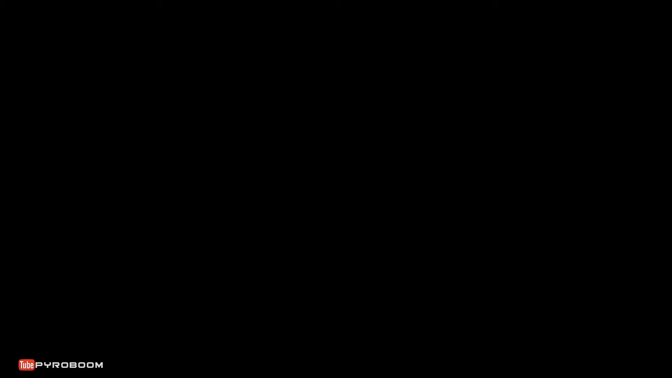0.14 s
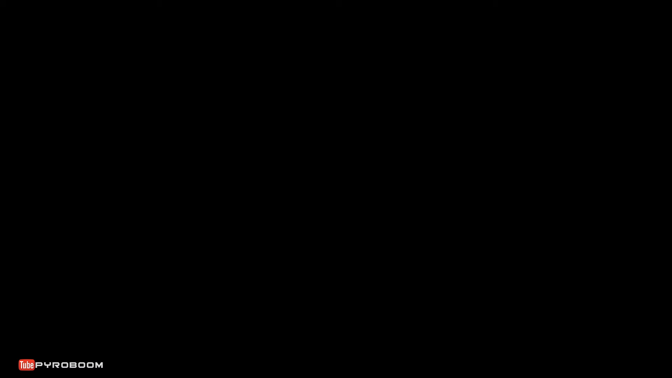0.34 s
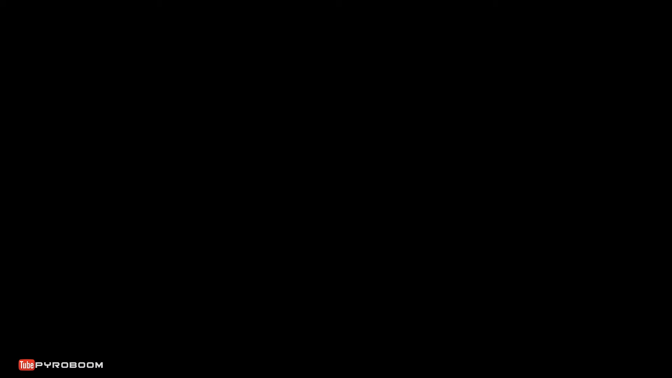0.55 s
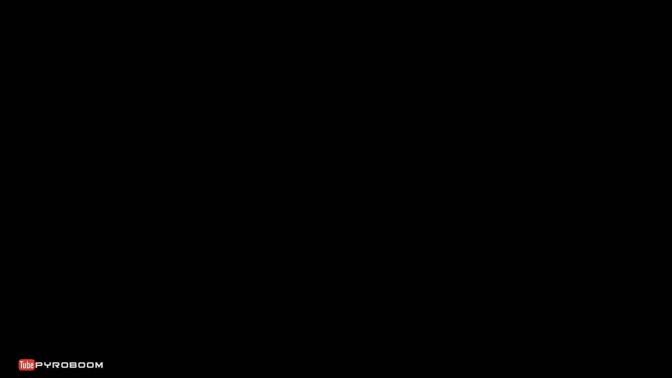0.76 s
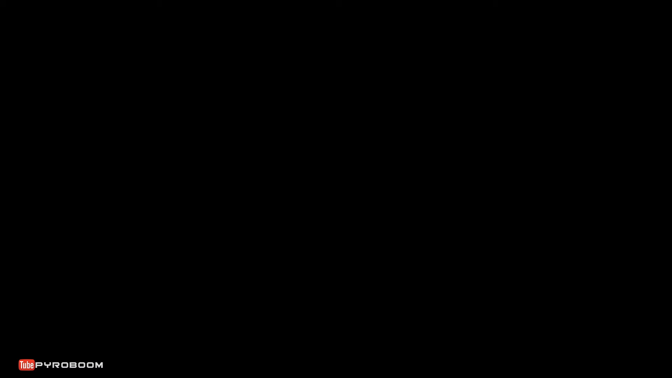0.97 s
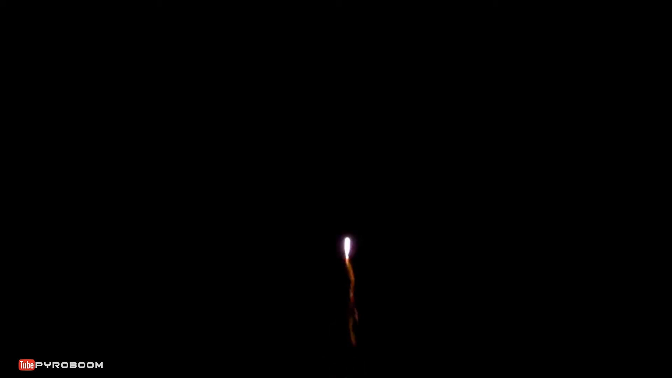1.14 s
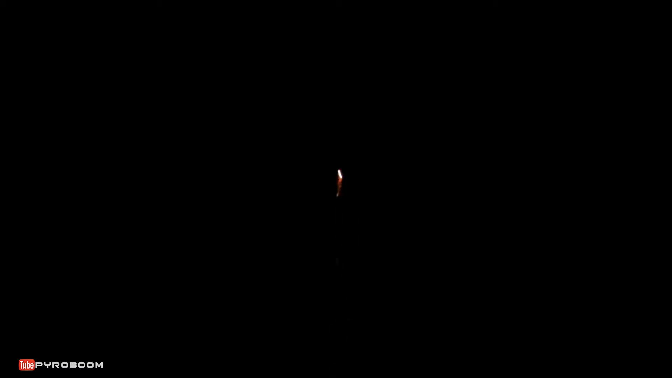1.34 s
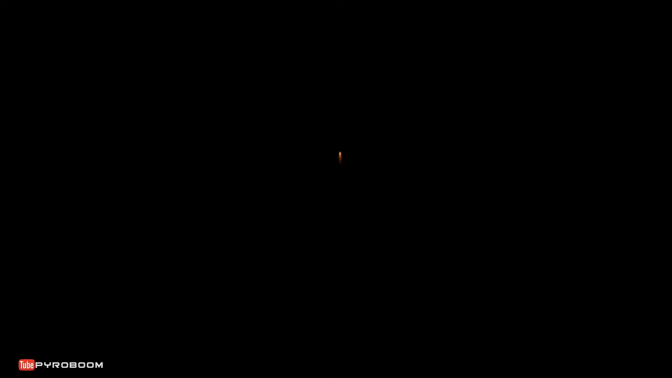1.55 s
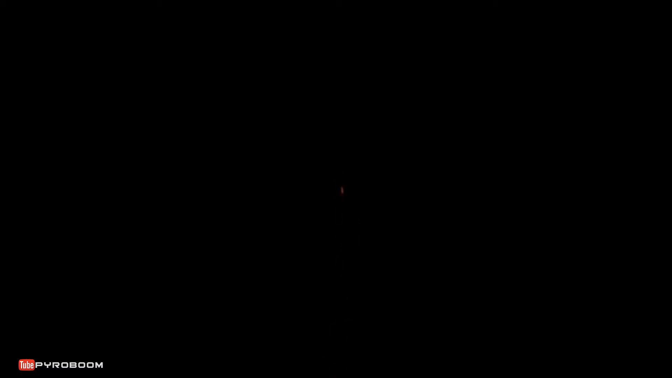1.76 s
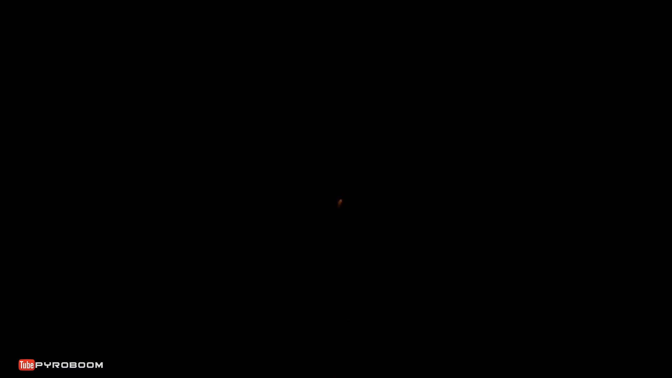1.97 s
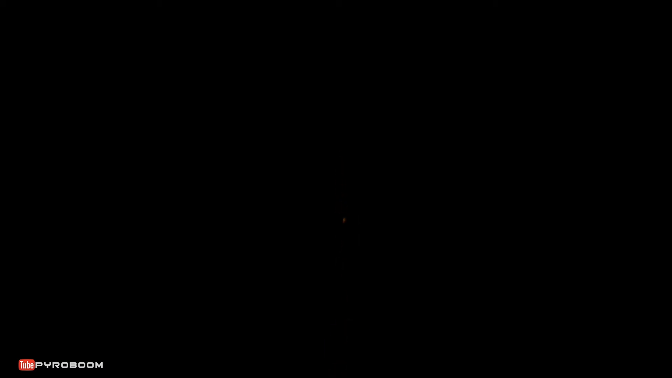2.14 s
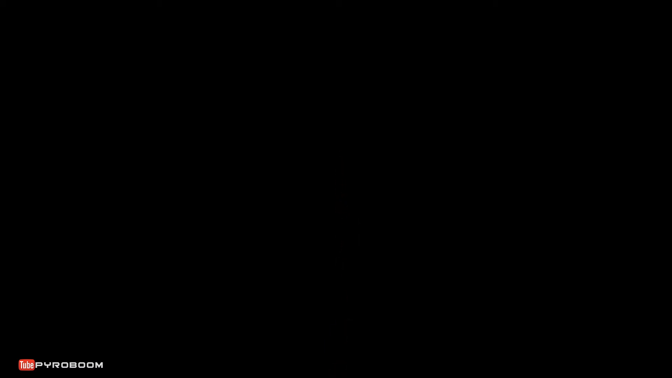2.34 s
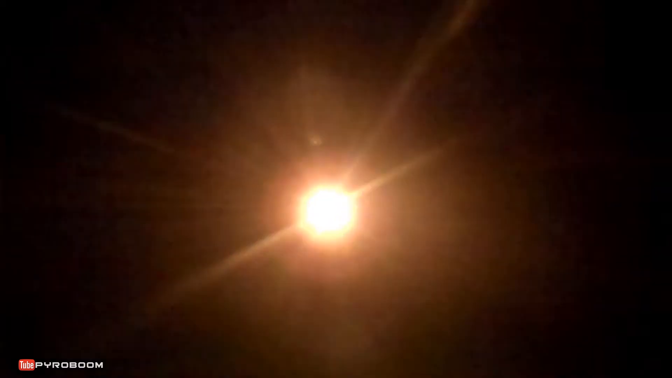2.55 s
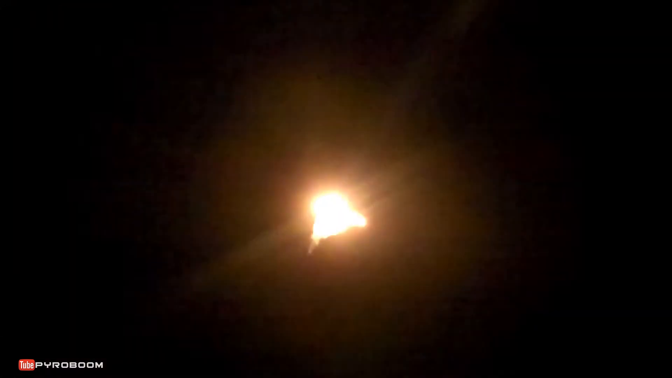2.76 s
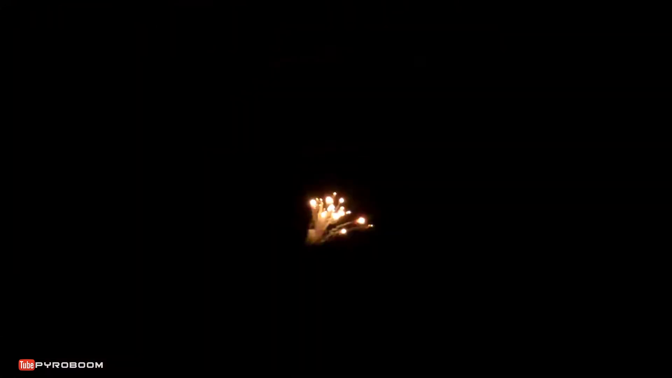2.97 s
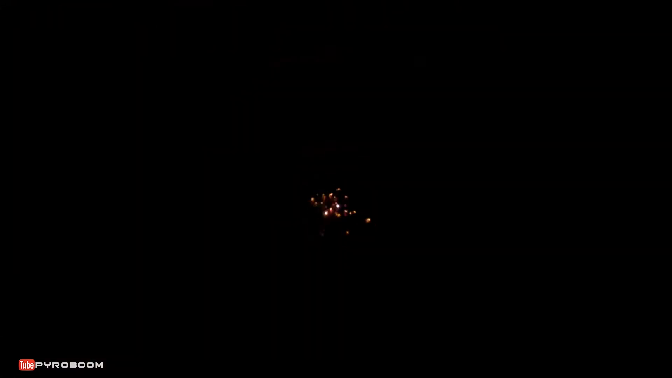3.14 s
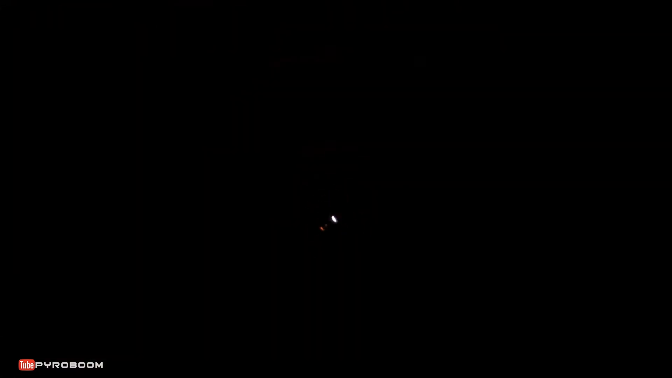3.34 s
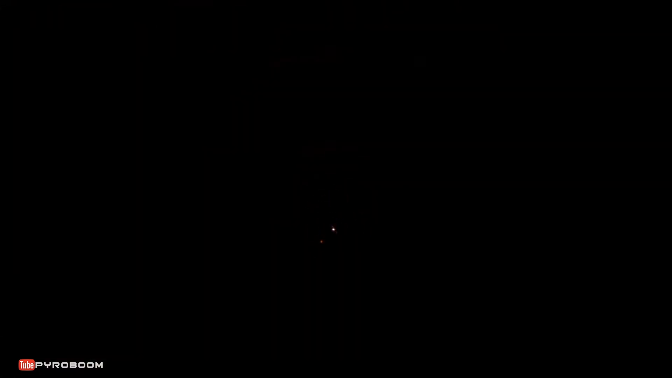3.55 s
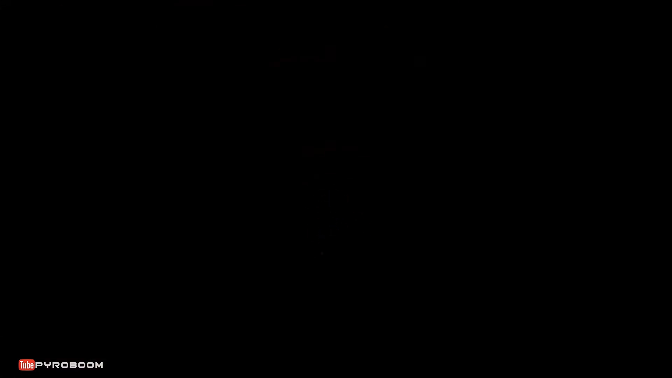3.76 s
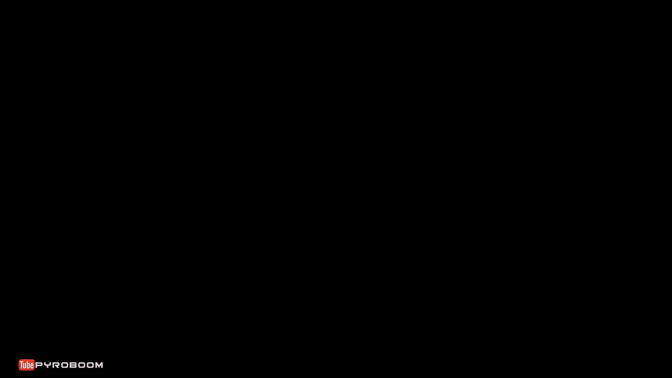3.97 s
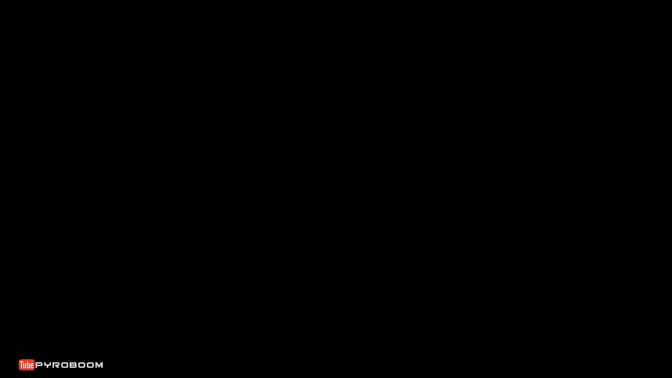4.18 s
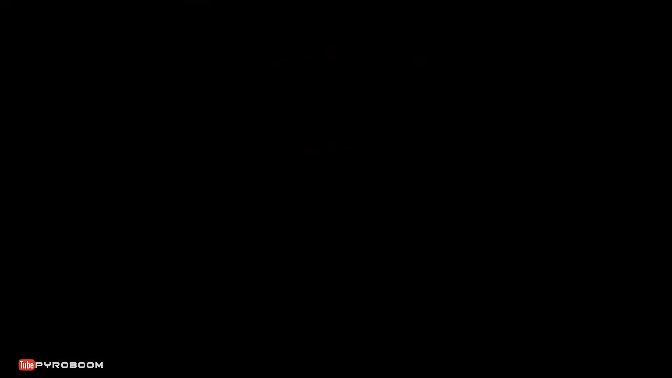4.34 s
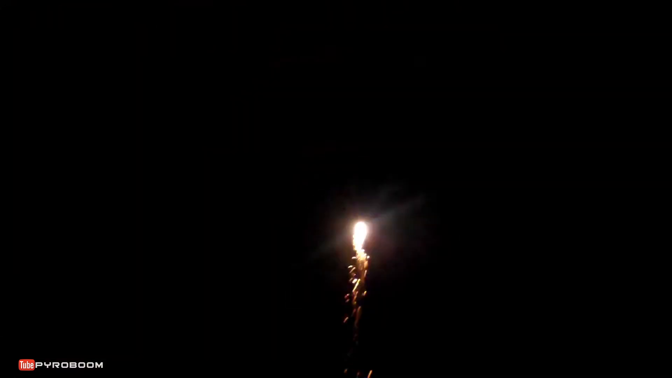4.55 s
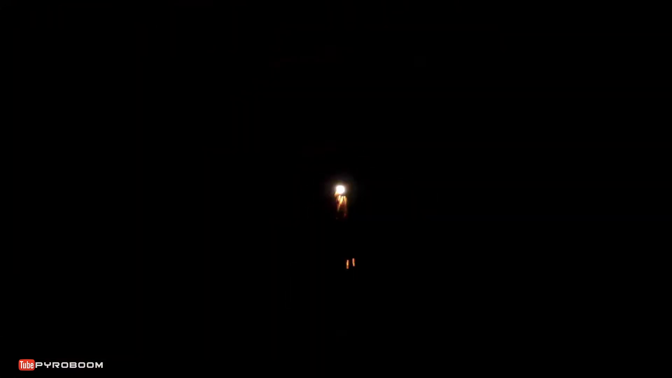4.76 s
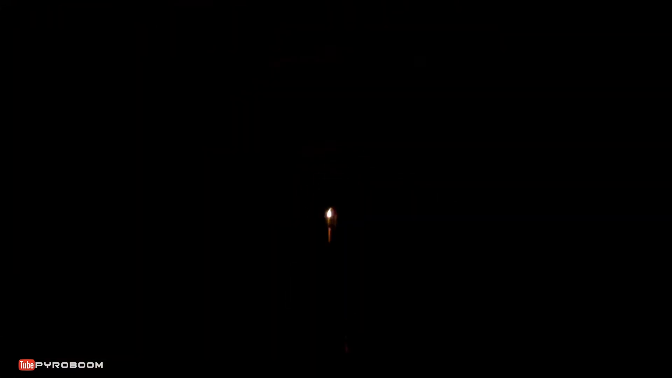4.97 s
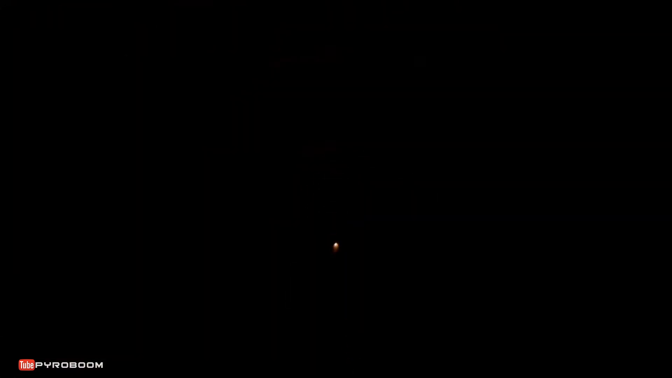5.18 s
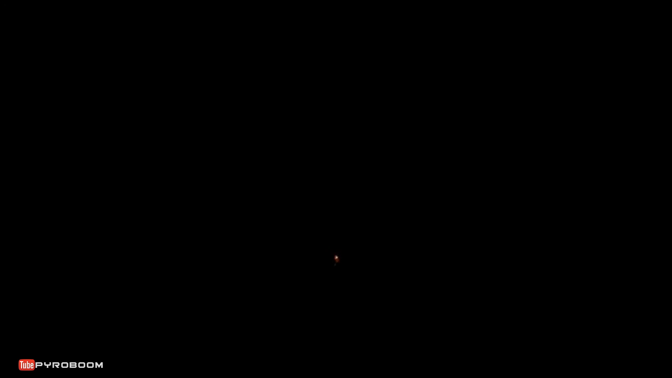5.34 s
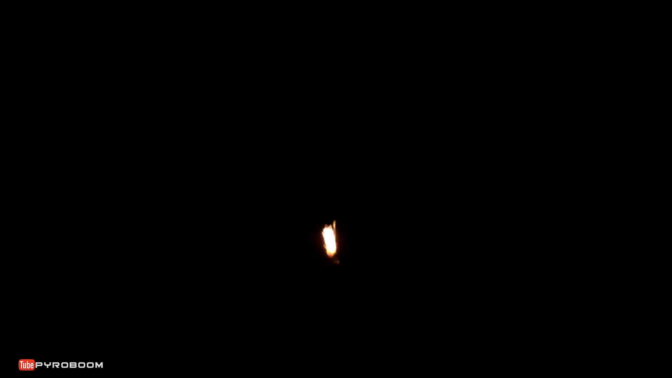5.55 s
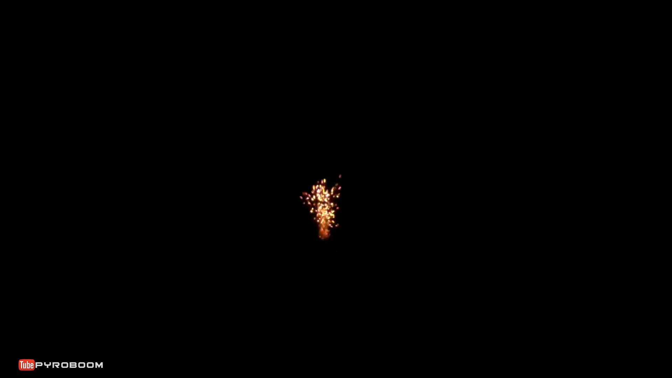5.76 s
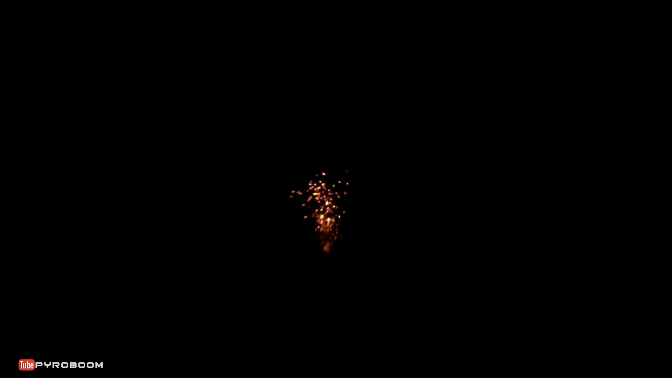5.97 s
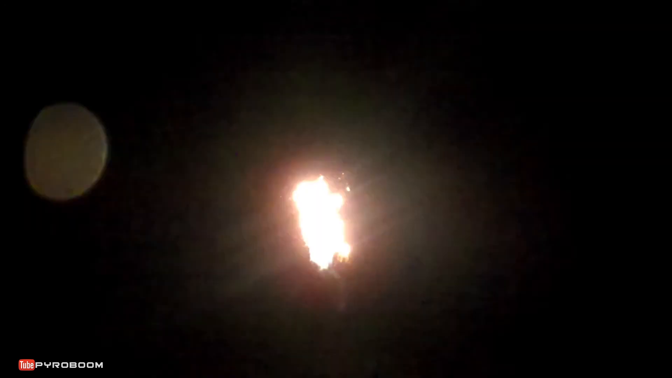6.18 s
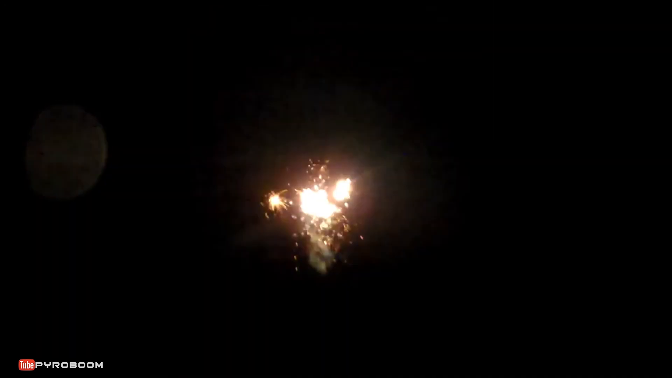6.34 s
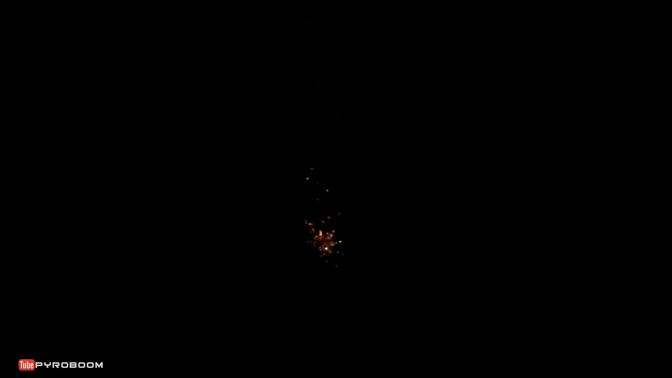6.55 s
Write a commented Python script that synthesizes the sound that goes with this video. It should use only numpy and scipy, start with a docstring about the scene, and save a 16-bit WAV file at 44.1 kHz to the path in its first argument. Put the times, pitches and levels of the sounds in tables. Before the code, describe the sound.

Soft, low night air and faint microphone hiss, with one tiny tick at 0.1 s. At 0.9 s a roman candle's lift charge explodes: a hard, clipped bang with bass push, short tubular ring and close slap, then far echoes rolling off and darkening over about a second. From 1.8 s a barely audible comet hiss rises. At 2.57 s the shot opens with a soft puffing pop and smooth bright hiss; a dull distant thud lands at 2.64 s, and the hiss dies by about 3.2 s. Quiet returns. At 4.25 s a second bang, thinner and higher-ringing, echoes away. Faint hiss from 4.85 s, small pops at 5.56 s and a stronger hiss fading, with tiny ticks. From 6.19 s single loud cracks burst into a dense volley at 6.24 s, sharp and overloaded with echoes, thinning into scattered weaker snaps by 6.6 s. Left is bright and piercing, right muffled.

```python
"""A roman candle fires outdoors at night: two lift charges bang and roll away in far echoes.
Shots open with pops (short swelling noise) and hisses (bright noise): a faint one as of a rising comet, then a
stronger one of burning stars. The stars of the second shot end in a dense volley of cracks, each a tiny blast wave.
A dull report is farther off, behind it the soft noise of the night. Two unlike microphone ports overload."""
import sys
import numpy as np
from scipy import signal
from scipy.fft import rfft, irfft
from scipy.io import wavfile

SR = 44100
rng = np.random.default_rng(int(sys.argv[2]) if len(sys.argv) > 2 else 0)


def waveform_to_disk(signal):
    """Save audio, clipped to [-1, 1], as 16-bit WAV at the path in sys.argv[1]."""
    frames = np.transpose(np.atleast_2d(signal))
    scaled = np.clip(frames, -1, 1) * 32767
    samples = np.round(scaled).astype(np.int16)
    wavfile.write(sys.argv[1], SR, samples)


N = 291501
TIME = np.arange(N) / SR   # s


# The two lift charges: (time [s], blast level [dB], boom peak [dB], boom overpressure [ms],
# ring of the tube [Hz], near echo level [dB], far echo level [dB], far echoes hold until [s after the bang])
LIFT_CHARGES = [(.9017, 9.5, -8, 3.6, 1297, -6, -31, 0.49),
                (4.2465, 7, -28.5, 1.5, 2090, -6.5, -31.5, 0.38)]
# Spectrum of the blast at the tube: (frequency [Hz], relative level [dB per Hz])
BLAST_SPECTRUM = [(25, -19), (100, -10.5), (250, -0.5), (550, 1.5), (900, -4), (1300, -5.5), (2500, -6.5),
                  (6000, -13.5), (15000, -17)]
# Spectrum of the near echoes: (frequency [Hz], relative level [dB per Hz])
NEAR_ECHO_SPECTRUM = [(25, -11.5), (100, -3.5), (250, -1), (500, 3.5), (850, -2.5), (1400, -1), (2500, -3),
                      (4200, -1.5), (6500, -8), (10000, -4.5), (15000, -22)]
NEAR_ECHO_T60_S = 0.14


def lifts(blast_t60=0.028, ring_db=2, ring_q=4, pre_swell_db=-23, pre_swell_s=.016, count=SR // 2):
    """A brief swell of noise comes just before each bang; then the ringing blast, near echoes and the far roll."""
    out, t = np.zeros((2, N)), TIME[:count]
    pre_swell_count = int(pre_swell_s * SR)
    for s, blast_db, boom_db, boom_ms, ring_hz, near_db, far_db, hold_s in LIFT_CHARGES:
        pre_swell = air_noise(POP_SPECTRUM, pre_swell_count) * np.sqrt(np.linspace(0, 1, pre_swell_count))
        add(out, s - pre_swell_s, from_db(pre_swell_db) * pre_swell)
        add(out, s, from_db(boom_db) * shock(boom_ms))   # the tube's push of gas carries the bass
        blast = from_db(blast_db) * air_noise(BLAST_SPECTRUM, count) * dying(t, blast_t60)
        tube_ring = signal.lfilter(*signal.iirpeak(ring_hz, ring_q, fs=SR), blast)
        add(out, s, blast + from_db(ring_db) * tube_ring)
        near_echoes = air_noise(NEAR_ECHO_SPECTRUM, count) * dying(t, NEAR_ECHO_T60_S)
        add(out, s, from_db(near_db) * near_echoes)
        add(out, s, from_db(far_db) * far_echoes(hold_s))
    return out


# Single far walls: (time after a report [s], level against the scatter, before the losses on the way [dB])
FAR_WALLS = [(.129, 9), (.197, 10), (.279, 12)]
# Spectrum of a wall's echo: (frequency [Hz], relative level [dB per Hz])
WALL_SPECTRUM = [(25, -14), (90, 13), (180, 31), (400, -16), (1300, 17), (4500, -10), (10000, 0),
                 (15000, -24)]
# Spectrum of the far scatter as it sets out: (frequency [Hz], relative level [dB per Hz])
FAR_SPECTRUM = [(25, -21.5), (80, -6.5), (160, 1), (320, -3.5), (600, 1.5), (1300, 0), (2200, 0.5),
                (4500, -1), (6500, -6.5), (10000, -10), (15000, -22.5)]
ROLL_RISE_S, ROLL_FADE_DB_PER_S = .07, 32
AIR_DB_PER_S, GROUND_DB_PER_S = 32.5, 32   # further loss of treble and of bass


def far_echoes(hold_s, count=2 * SR, lumpy_db=1.0, wall_t60=0.022, bass_hz=300, treble_hz=2500):
    """Scatter from trees and houses; air takes its treble and the ground its bass as the path grows."""
    t = TIME[:count]
    lumps = rms_one(low_pass(rng.standard_normal(count), 77, order=2))
    roll = envelope(t, ROLL_RISE_S, hold_s, ROLL_FADE_DB_PER_S)
    scatter = air_noise(FAR_SPECTRUM, count) * roll * from_db(lumpy_db * lumps)
    for s, db in FAR_WALLS:
        wall_echo = air_noise(WALL_SPECTRUM, count=2048) * dying(TIME[:2048], wall_t60)
        add(scatter, s, from_db(db) * wall_echo)
    bass = signal.sosfiltfilt(signal.butter(2, bass_hz, fs=SR, output="sos"), scatter)
    treble = signal.sosfiltfilt(signal.butter(1, treble_hz, "high", fs=SR, output="sos"), scatter)
    middle = scatter - bass - treble
    return middle + bass * from_db(-GROUND_DB_PER_S * t) + treble * from_db(-AIR_DB_PER_S * t)


# Stars that crack alone, before and after the thick of the volley: (time [s], peak of the direct sound [dB])
LONE_CRACKS = [(6.1897, 16), (6.2019, 9.5), (6.219, 13), (6.2245, 10.5), (6.2313, 7), (6.2372, 10.5),
               (6.242, 11), (6.5204, -9), (6.5409, -6.5), (6.5479, -10), (6.5523, -10.5), (6.5651, -8),
               (6.5833, -7), (6.5862, -7), (6.5948, -13)]
CRACK_MS = .16   # length of a lone crack's overpressure
# Spectrum of the cracks' near echoes: (frequency [Hz], relative level [dB per Hz])
SKY_SPECTRUM = [(30, -11), (200, 9.5), (700, 3), (1400, -3), (2100, 0), (3500, 2), (6200, 4.5), (8000, 10),
                (14000, -11)]
CRACK_ECHO_DB = -38   # near echoes, as a filter gain


def crackle(near_t60=0.13, far_db=-64, far_hold_s=.3, count=SR // 4):
    """Every star ends in a tiny shock; the ground and the surroundings smear them together."""
    direct = volley()
    for s, db in LONE_CRACKS:
        add(direct, s, from_db(db) * shock(CRACK_MS))
    echoes = from_db(far_db) * far_echoes(far_hold_s)
    near_echoes = air_noise(SKY_SPECTRUM, count) * dying(TIME[:count], near_t60)
    add(echoes, .0045, from_db(CRACK_ECHO_DB) * near_echoes)
    return direct + signal.fftconvolve(direct[None], echoes, axes=-1)[:, :N]


# The volley, by size of star: (first rate [cracks per s], all spent after [s], typical peak before the surge [dB],
# fade [dB per s], typical overpressure [ms])
STAR_SIZES = [(290, .29, -2.5, 15, .14), (600, .32, -7.5, 15, .09)]
VOLLEY_START_S = 6.243
SURGE_DB, SURGE_S = 12.5, .014   # the volley opens with a short, louder surge
STAR_SPREAD_DB, LENGTH_SPREAD = 2, 0.16   # from star to star; the length's in natural log


def volley(count=300):
    """Stars go off at uneven moments, ever sparser and weaker until all are spent."""
    out, t = np.zeros(N), TIME[:SR]
    for per_s, spent_s, db, fade_db_per_s, length_ms in STAR_SIZES:
        gone_off = np.cumsum(per_s * np.maximum(1 - (t / spent_s) ** 2, 0)) / SR   # expected count so far
        turns = np.arange(count) + 2 * rng.random(count)
        chance = rng.standard_normal((count, 2))
        for turn, (size, length) in zip(turns[turns < gone_off[-1]], chance):
            age = t[np.searchsorted(gone_off, turn)]
            surge_db = SURGE_DB * np.exp(-(age / SURGE_S) ** 2)
            peak_db = db - fade_db_per_s * age + surge_db + STAR_SPREAD_DB * size
            crack = shock(length_ms * np.exp(LENGTH_SPREAD * length))
            add(out, VOLLEY_START_S + age, from_db(peak_db) * crack)
    return out


# Small ticks and pops: one bright tick near the start, others around the openings of the shots:
# (time of the peak [s], level [dB], half the length of the swell [s], t60 [s], tilt above 1 kHz [dB per octave])
SMALL_POPS = [(.0955, -43, .002, .02, 5), (2.571, -20, .011, .018, 0), (2.584, -33, .002, .04, -5),
              (5.5595, -33, .001, .014, -7), (5.5725, -32.5, .004, .025, -3), (5.584, -38, .002, .05, -6),
              (5.845, -49, .001, .02, 2), (5.867, -48, .001, .02, 2), (6.133, -48, .001, .02, -2)]
# Spectrum of a pop before its tilt: (frequency [Hz], relative level [dB per Hz])
POP_SPECTRUM = [(30, -32), (90, -18), (160, -2.5), (300, -3), (800, -5), (1500, 0), (3000, -5), (4600, -1),
                (7000, -0.5), (15000, -9)]


def pops(count=SR // 4):
    """Short bursts of noise that swell and then die away quickly."""
    out, t = np.zeros((2, N)), TIME[:count]
    for s, db, half_swell, t60, tilt_db in SMALL_POPS:
        spectrum = [(hz, level + tilt_db * np.log2(max(hz, 1000))) for hz, level in POP_SPECTRUM]
        swell = 2 * half_swell
        rise = dying(np.maximum(swell - t, 0), swell)
        fall = dying(np.maximum(t - swell, 0), t60)
        add(out, s - swell, from_db(db) * air_noise(spectrum, count) * rise * fall)
    return out


# Hisses: a faint one before each opening, as of a rising comet, then the stronger burning stars:
# (time [s], level before the gain and the sag [dB], rise [s], hold until [s after the start],
# fade beyond the sag [dB per s])
HISSES = [(1.8, -67.5, 0.072, 0.46, 60), (2.575, -52.5, 0.017, 0.51, 100), (4.85, -58.5, 0.12, 0.59, 91),
          (5.59, -50.5, .08, 0.13, 42)]
# Spectrum of the hiss: (frequency [Hz], relative level [dB per Hz])
HISS_SPECTRUM = [(100, -12), (500, -2), (1000, 1.5), (2000, -0.5), (4000, -2.5), (6500, -1.5), (9000, 0),
                 (14000, -15)]
HISS_SAG_DB_PER_S = 7   # each hiss sinks slowly


def hiss(gain_db=5.0):
    """Comets and stars hiss with a smooth, bright noise that rises, sinks slowly and goes out."""
    level = np.zeros(N)
    for s, db, rise_s, hold_s, fade_db_per_s in HISSES:
        age = TIME - s
        level += from_db(db - HISS_SAG_DB_PER_S * age) * envelope(age, rise_s, hold_s, fade_db_per_s)
    return from_db(gain_db) * level * air_noise(HISS_SPECTRUM, N)


# A dull report from farther off: (time [s], peak of its front [dB], t60 of its scatter [s])
DISTANT_THUD = (2.6405, -20.5, 0.25)
# Spectrum dulled by the distance: (frequency [Hz], relative level [dB])
DULL_SPECTRUM = [(40, -23), (270, -16), (450, -5), (750, 7), (1400, 2.5), (2500, -4.5), (4000, -16),
                 (7000, -37), (15000, -47)]
THUD_ROLL_T60_S = 1.2


def thud(front_ms=0.67, scatter_db=-13, far_db=-39, count=SR // 2):
    """A blast wave dulled by distance, with its scatter and a faint roll behind it."""
    out, t = np.zeros((2, N)), TIME[:count]
    s, db, t60 = DISTANT_THUD
    front = coloured(shock(front_ms), DULL_SPECTRUM)
    add(out, s, from_db(db) * front / np.abs(front).max())
    scatter = air_noise(DULL_SPECTRUM, count) * dying(t, t60) * (1 - dying(t, 0.0099))
    add(out, s, from_db(db + scatter_db) * scatter)
    roll = air_noise(DULL_SPECTRUM, count) * dying(t, THUD_ROLL_T60_S)
    add(out, s, from_db(db + far_db) * roll)
    return out


# Spectrum of the night air: (frequency [Hz], relative level [dB per Hz])
NIGHT_SPECTRUM = [(20, -5), (60, 1.5), (170, -3), (500, 3), (1000, 2), (1500, -4.5), (2200, -7),
                  (4000, -13.5), (6000, -21.5), (14000, -33)]


def night_air(level_db=-55):
    """The steady soft noise of the night, spread wider between the ports than the other noises."""
    return from_db(level_db) * air_noise(NIGHT_SPECTRUM, N, apart=0.45)


def shock(length_ms, suction=2.014, count=1024):
    """N-shaped blast wave: a sudden overpressure falls through zero into a suction that closes quickly."""
    age = TIME[:count] * 1000 / length_ms   # in lengths of the overpressure
    return (1 - age) * np.exp(-(age / suction) ** 8)


def air_noise(spectrum, count, apart=0.23, apart_hz=3500):
    """Noise at two close ports: mostly alike in the bass, unlike in the treble; rms 1."""
    mid, side = rng.standard_normal((2, count))
    side = side - (1 - apart) * low_pass(side, apart_hz)
    return rms_one(coloured(mid + side * [[1], [-1]], spectrum))


def envelope(age, attack_s, hold_s, release_db_per_s):
    """Rises in attack_s, stays until hold_s, then fades evenly in dB."""
    return np.clip(age / attack_s, 0, 1) * from_db(-release_db_per_s * np.maximum(age - hold_s, 0))


def dying(t, t60):
    """Falls by 60 dB in t60."""
    return np.exp(-np.log(1000) * t / t60)


def coloured(x, spectrum, size=4096):
    """Causal (minimum-phase) filter with the given magnitude."""
    hz = np.maximum(np.fft.rfftfreq(size, 1 / SR), 1)
    points = np.array(spectrum)
    magnitude_db = np.interp(np.log(hz), np.log(points[:, 0]), points[:, 1])
    cepstrum = irfft(np.log(from_db(magnitude_db)))
    cepstrum[1:size // 2] *= 2   # fold onto positive times
    cepstrum[size // 2 + 1:] = 0
    response = irfft(np.exp(rfft(cepstrum)))
    return signal.oaconvolve(np.atleast_2d(x), response[None], axes=-1)[:, :x.shape[-1]]


def low_pass(x, hz, order=1):
    """Butterworth low-pass."""
    return signal.sosfilt(signal.butter(order, hz, fs=SR, output="sos"), x)


def from_db(db):
    """Decibels to gain."""
    return 10 ** (np.asarray(db) / 20)


def rms_one(x):
    """Scale to rms 1."""
    return x / np.sqrt(np.mean(x ** 2) + 1e-20)


def add(out, s, sound):
    """Mix a sound in at time s."""
    start = int(np.clip(round(s * SR), 0, N - 1))
    out[..., start:start + sound.shape[-1]] += sound[..., :N - start]


def scene():
    """Sound pressure at the two ports."""
    return lifts() + crackle() + pops() + hiss() + thud() + night_air()


# Response of the left port, with a strong treble resonance: (frequency [Hz], gain [dB])
LEFT_RESPONSE = [(20, 0.5), (1000, 0.5), (4000, 2.5), (5200, 6.5), (5800, 12.5), (6200, 17), (6600, 12),
                 (7100, 6.5), (8000, -0.5), (10000, -9), (14000, -9), (15300, -24.5)]
# Response of the right port, muffled, with a broad resonance near 1.5 kHz and a steep fall above 5 kHz:
# (frequency [Hz], gain [dB])
RIGHT_RESPONSE = [(20, -11), (280, -12), (650, -6), (1000, -4), (1300, 2.5), (1750, 2.5), (2100, 0),
                  (2600, -5), (3700, -6), (4650, -5.5), (5000, -11), (5600, -36.5), (8000, -34.5),
                  (16000, -45.5)]
SELF_NOISE_DB, SELF_NOISE_TOP_HZ = -62.5, 14300   # level before its low-pass
CLIP_LEVEL, CUTOFF_HZ = .92, 15600


def record(dry):
    """Each port colours the sound; the preamplifier adds faint noise and clips hard; the top is cut."""
    left = coloured(dry[0], LEFT_RESPONSE)
    right = coloured(np.r_[0, dry[1, :-1]], RIGHT_RESPONSE)   # one sample later
    self_noise = low_pass(rng.standard_normal((2, N)), SELF_NOISE_TOP_HZ, order=24)
    preamp = np.vstack([left, right]) + from_db(SELF_NOISE_DB) * self_noise
    return low_pass(np.clip(preamp, -CLIP_LEVEL, CLIP_LEVEL), CUTOFF_HZ, order=14)


dry = scene()
out = record(dry)
waveform_to_disk(out)
```